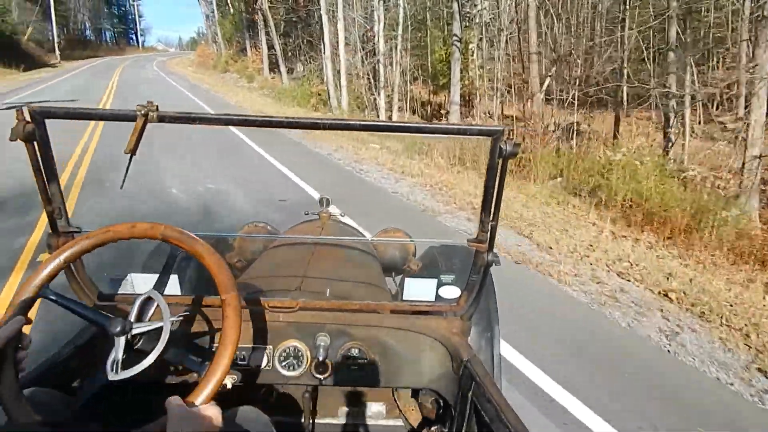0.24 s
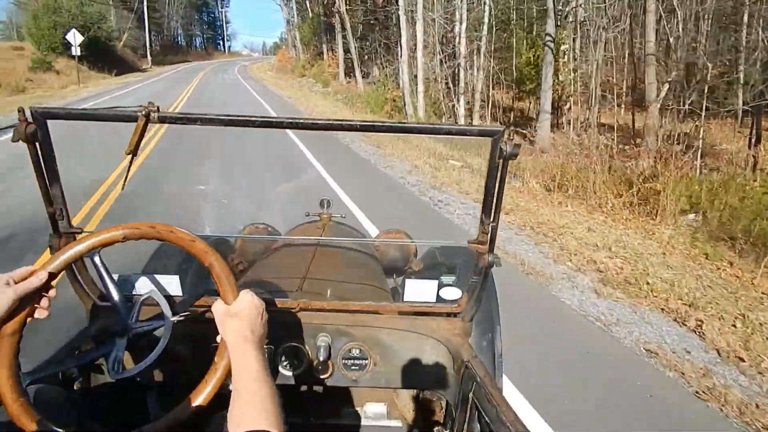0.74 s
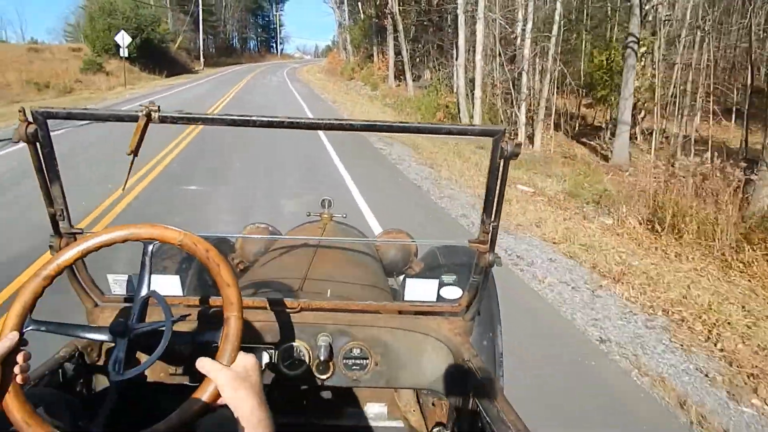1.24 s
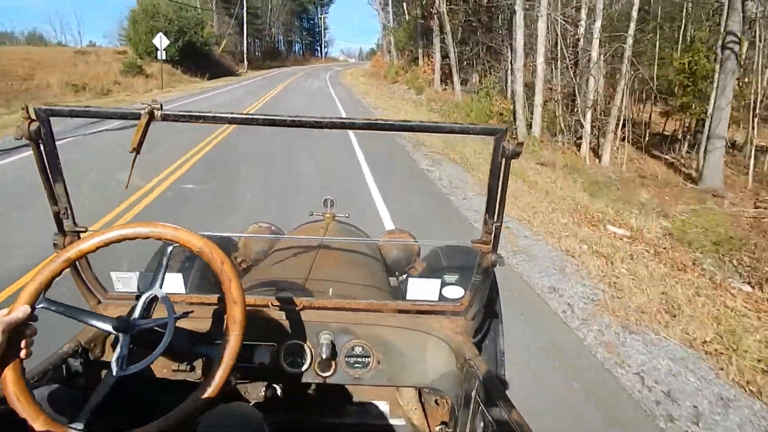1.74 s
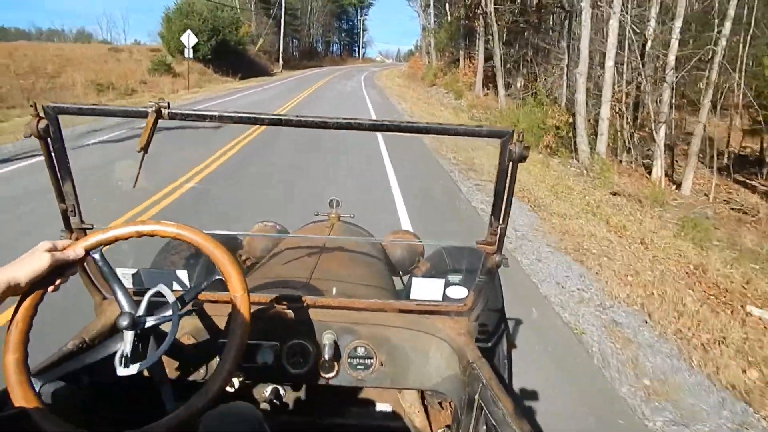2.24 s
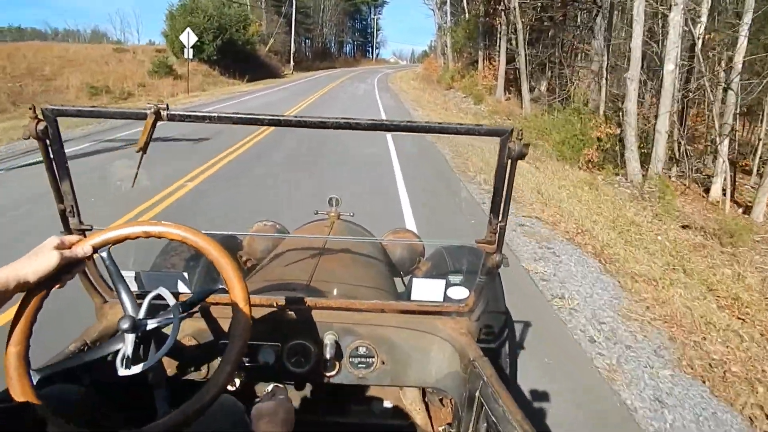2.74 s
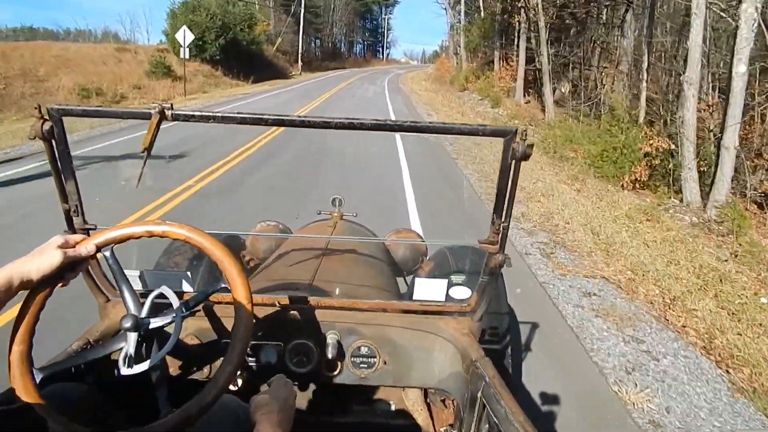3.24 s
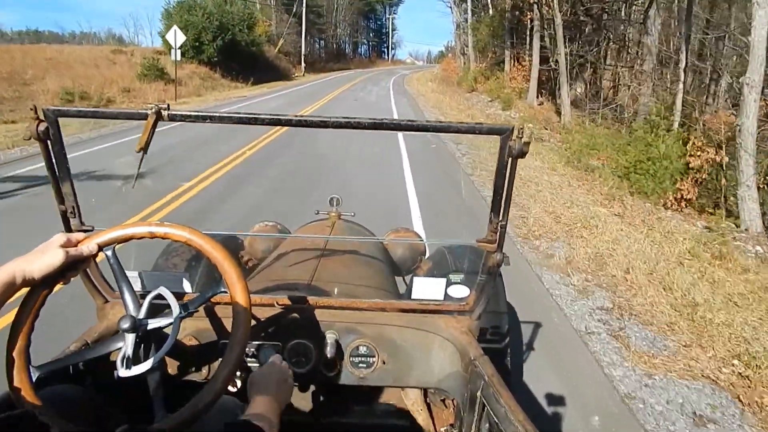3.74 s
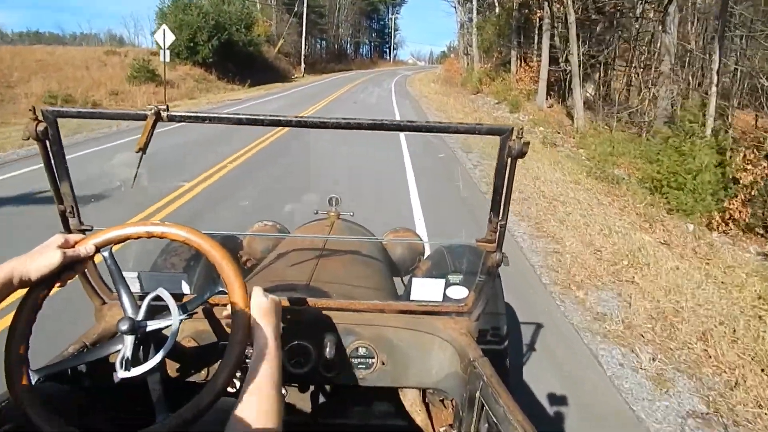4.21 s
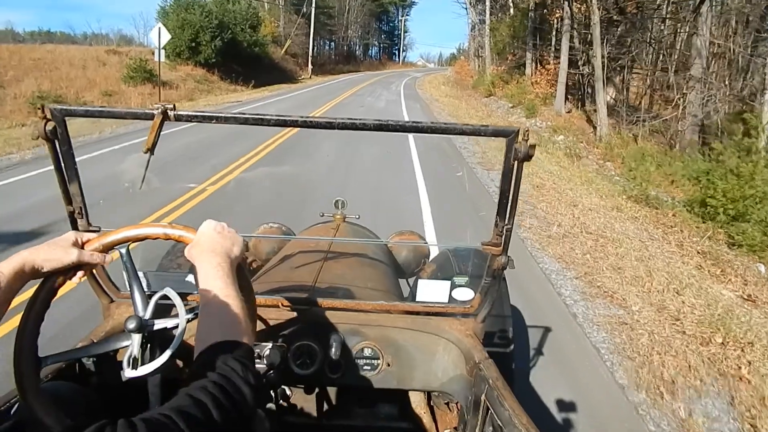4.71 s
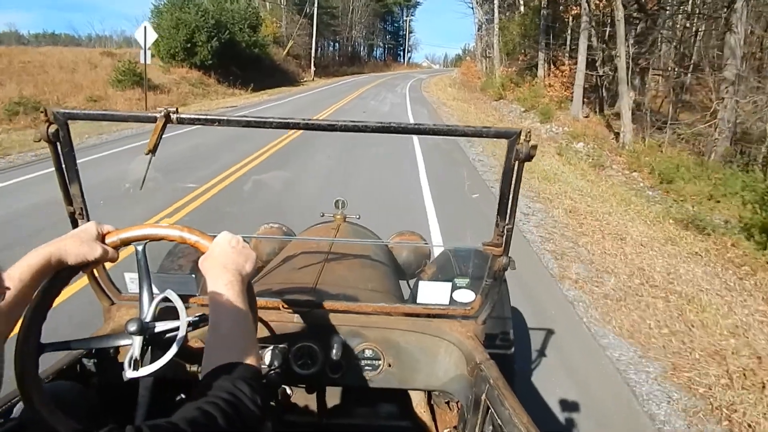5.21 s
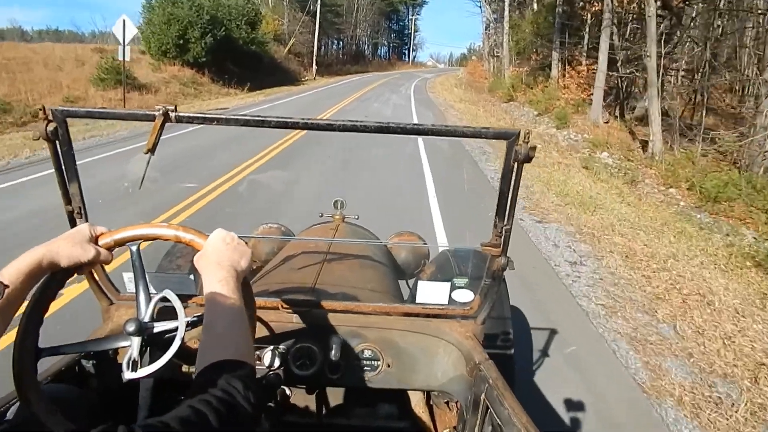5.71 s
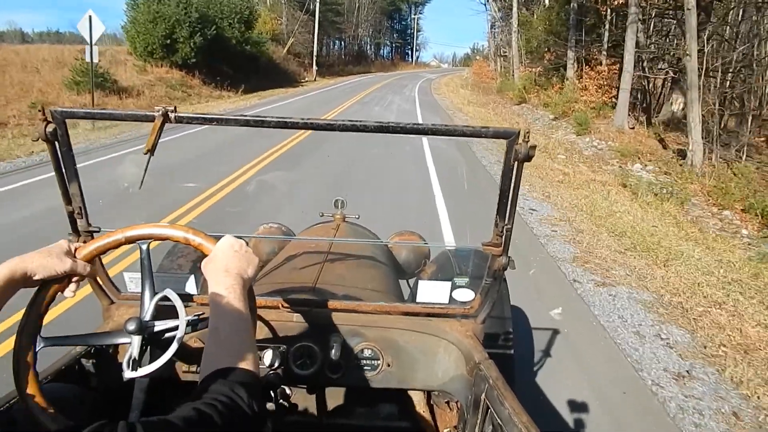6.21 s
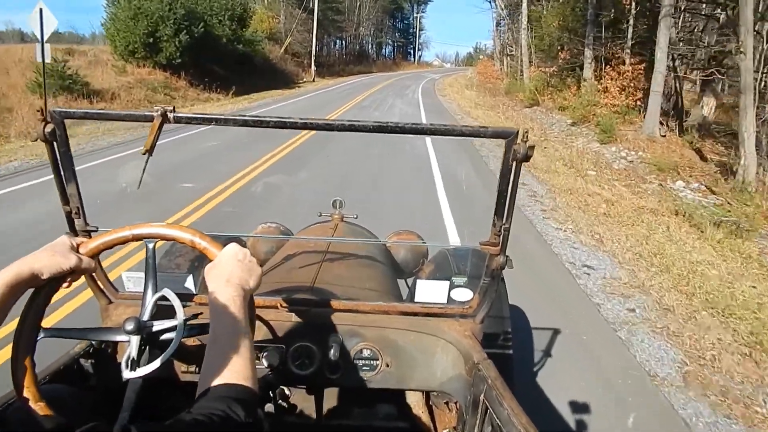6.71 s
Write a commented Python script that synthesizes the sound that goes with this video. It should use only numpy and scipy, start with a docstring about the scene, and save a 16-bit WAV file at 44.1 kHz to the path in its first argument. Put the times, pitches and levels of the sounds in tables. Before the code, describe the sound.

An old open car pulls away along a country road, heard from the driver's seat. The engine climbs with a throbbing roar, a rhythmic spitting hiss and a thin gear whine. The sound dips briefly, gear teeth grate, and the engine catches with uneven thumps. The revs then sag until it stumbles, while gusts of wind thud and flutter on the close microphone.

```python
"""A country road, heard from the driver's seat of an old six-cylinder open car as it pulls away.
The engine revs up, the sound drops out briefly, gear teeth grate, the revs sag and the engine stumbles.
Each firing sends a pulse down the tail pipe and shakes the body into a roar; one cylinder spits a hiss
once per engine cycle. The gearbox whines, and wind buffets two close microphone ports."""
import sys
import numpy as np
from scipy import signal
from scipy.fft import rfft, irfft
from scipy.io import wavfile

SR = 44100
rng = np.random.default_rng(int(sys.argv[2]) if len(sys.argv) > 2 else 0)


def put_to_file(sound):
    """Save the sound as 16-bit audio at rate SR, in the file named by the first command-line argument."""
    columns = np.atleast_2d(sound).T  # one column per channel
    safe = np.clip(columns, -1, 1)
    whole_steps = np.round(safe * 32767)
    wavfile.write(sys.argv[1], SR, whole_steps.astype(np.int16))


N = 306495
TIME = np.arange(N) / SR   # seconds


def from_db(db):
    """Turn decibels into a number to multiply by."""
    return 10 ** (np.asarray(db) / 20)


def rms_one(x):
    """Scale a signal to an average strength (rms) of 1."""
    return x / np.sqrt(np.mean(x ** 2) + 1e-20)


def in_time(rows):
    """Join a table's points with straight lines over time, one curve per value column."""
    times, *columns = np.transpose(rows)
    return [np.interp(TIME, times, column) for column in columns]


def at_hz(points, hz):
    """Look up a table's value at a pitch, with octaves evenly spaced."""
    pitches, values = np.transpose(points)
    return np.interp(np.log(hz), np.log(pitches), values)


def drift(rate):
    """A smooth random wobble of about size 1; a higher rate wobbles faster."""
    r = np.exp(-80 * np.pi * rate / SR)
    slow = signal.lfilter([1], [1, -2 * r, r * r], rng.standard_normal(N // 40 + 2002))[2000:]
    return np.interp(np.arange(N) / 40, np.arange(len(slow)), rms_one(slow))


def resonate(x, modes):
    """Let a signal ring at several pitches, added with alternating signs; narrow ones ring longer."""
    out = 0
    for k, (hz, width_hz, level_db) in enumerate(modes):
        r = np.exp(-np.pi * width_hz / SR)
        b = (1 - r * r) / 2 * np.array([1, 0, -1])
        a = [1, -2 * r * np.cos(2 * np.pi * hz / SR), r * r]
        out = out + (-1) ** k * from_db(level_db) * signal.lfilter(b, a, x + 1e-18)
    return out


def clicks(events):
    """One click for each (time, level) row."""
    out = np.zeros(N)
    for s, peak_db in events:
        out[round(s * SR)] = from_db(peak_db)
    return out


def bursts(events, rise_s, fall_s, tail_s, tail):
    """A loudness curve that jumps at each event, falls fast and leaves a slower tail."""
    t = np.arange(round(.15 * SR)) / SR
    shape = (1 - np.exp(-t / rise_s)) * (np.exp(-t / fall_s) + tail * np.exp(-t / tail_s))
    return signal.fftconvolve(clicks(events), shape / shape.max())[:N]


def held(rows, rise_s, fall_s):
    """A loudness curve that fades in, holds from each row's start to its end, and fades out."""
    return sum(from_db(db) * np.interp(TIME, [start - rise_s, start, end, end + fall_s], [0, 1, 1, 0]) ** 2
               for start, end, db in rows)


# how alike left and right are: (pitch [Hz], likeness [1 = the same])
STEREO_LIKENESS = [(60, 1), (700, 1), (1100, 0.81), (2400, 0.41), (6000, 0.093), (15000, -0.15)]

def stereo_noise(spectrum):
    """Noise with a given tone colour, the same on both sides in the bass and wide in the treble."""
    hz = np.maximum(np.fft.rfftfreq(N, 1 / SR), 1)
    alike = np.clip(at_hz(STEREO_LIKENESS, hz), -1, 1)
    mid, side = rfft(rng.standard_normal((2, N)))
    both = np.sqrt(1 + alike) * mid + np.sqrt(1 - alike) * side * [[1], [-1]]
    return rms_one(irfft(both * from_db(at_hz(spectrum, hz)), N))


# exhaust pulse of each of the six cylinders: (strength [dB])
CYLINDER_STRENGTHS = [-1.5, -1.5, -1, -2.5, 0, -6]

def firing_pulses(firings, uneven_db):
    """The cylinders fire in turn, one click each, never quite alike."""
    at = np.flatnonzero(np.diff(np.floor(firings)))
    pulses = np.zeros(N)
    pulses[at] = from_db(np.resize(CYLINDER_STRENGTHS, len(at)) + uneven_db * rng.standard_normal(len(at)))
    return pulses


# spells of deep wind: (start [s], end [s], level [dB])
BUFFET_SPELLS = [(-.1, 2.6, -54), (1.9, 2.4, -47), (4.0, 4.5, -47), (5.5, 6.95, -39)]

def wind_buffet():
    """Wind beats on the microphone ports with a deep, lumpy rumble."""
    rumble = stereo_noise([(12, -15), (22, -23), (40, 14), (60, 11), (120, -34), (300, -90)])
    lumps = from_db(2.5 * drift(5.0))
    return held(BUFFET_SPELLS, rise_s=0.32, fall_s=0.25) * lumps * rumble


# wind between gusts: (time [s], thud level [dB], flutter level [dB])
BREEZE_LEVELS = [(0, -37, -42), (2.1, -36.5, -46), (2.9, -40, -38), (3.75, -42.5, -36), (4.8, -27, -40.5),
                 (6.3, -23, -31.5), (6.45, -81, -65), (6.95, -70, -75)]
# single gusts: (time [s], thud level [dB], flutter level [dB])
GUST_PEAKS = [(.7, -23, -39), (.85, -23, -39), (2.27, -26, -30), (2.52, -19, -33), (2.7, -36, -28),
              (2.78, -36, -28), (2.89, -27, -26), (3.36, -33, -40), (3.87, -25, -51), (3.97, -18.5, -32),
              (4.1, -20, -38), (4.33, -18, -27), (4.65, -29, -32), (5.05, -24, -36), (5.28, -24, -39),
              (5.62, -12.5, -31.5), (5.9, -29, -28), (6.23, -35, -26.5), (6.339, -51, -26),
              (6.42, -58, -29.5)]
# how the ports ring, one list for the thud and one for the flutter: (pitch [Hz], width [Hz], level [dB])
PORT_RINGS = [
    [(108, 125, -3.5), (62, 37, -3)],
    [(382, 146, 4), (690, 340, -3.5)],
]

def wind_gusts():
    """Gusts ring each port on its own, making a low thud and a higher flutter."""
    out = 0
    times, *peaks_db = np.transpose(GUST_PEAKS)
    for modes, breeze_db, peak_db in zip(PORT_RINGS, in_time(BREEZE_LEVELS), peaks_db):
        gain = from_db(breeze_db) + held(zip(times, times, peak_db), rise_s=0.085, fall_s=0.095)
        lumps = from_db(4.5 * np.array([drift(13.3), drift(27.0)]))
        ringing = resonate(resonate(rng.standard_normal((2, N)), modes), modes)
        out = out + np.sqrt(2) * gain * rms_one(lumps * ringing)
    return out


# loudness of the car body and the air: (time [s], roar level [dB], hiss level [dB])
ROAR_AND_HISS_LEVELS = [(0, -25, -40), (1.15, -26, -40.5), (1.8, -24, -38), (2.6, -27.5, -40.5),
                        (2.9, -23.5, -38), (3.8, -25.5, -36.5), (3.98, -20, -34), (4.22, -26.5, -39.5),
                        (5.5, -26, -41.5), (5.9, -25.5, -40.5), (6.4, -27.5, -41.5), (6.78, -31.5, -43.5),
                        (6.95, -28.5, -37)]
# tone colour of the air: (pitch [Hz], relative level [dB])
AIR_COLOUR = [(880, 2), (1500, -7), (1880, -5.5), (2530, -6.5), (3330, -6), (7380, -11), (8990, -9),
              (11800, -8), (14500, -14.5), (15700, -43)]

def air_hiss(dip_db):
    """The air hisses, flickering slightly."""
    _, hiss_db = in_time(ROAR_AND_HISS_LEVELS)
    return from_db(hiss_db + dip_db + 1.36 * drift(26.0)) * stereo_noise(AIR_COLOUR)


# tone colour of the roar: (pitch [Hz], relative level [dB])
ROAR_COLOUR = [(110, -60), (190, -7.5), (282, -12), (355, 0), (403, 0), (435, -5), (476, -3.5), (697, -9),
               (772, -10.5), (959, -17.5), (1930, -26.5), (2530, -31), (4000, -37.5), (5200, -65),
               (8800, -120)]
# how the body panels ring: (pitch [Hz], width [Hz], level [dB])
PANEL_RINGS = [(370.8, 58, 1.5), (562.8, 24, 3.5), (469, 59, -7), (657, 45, -7)]

def body_roar(firings, firing_hz, dip_db):
    """The body roars, throbbing with each firing and brighter at high revs; its shaken panels ring."""
    roar_db, _ = in_time(ROAR_AND_HISS_LEVELS)
    noise = stereo_noise(ROAR_COLOUR)
    treble = signal.sosfilt(signal.butter(2, 600, "high", fs=SR, output="sos"), noise)
    noise = noise + (from_db(0.18 * (firing_hz - 66.5)) - 1) * treble
    shaking = rms_one(firing_pulses(firings, uneven_db=3.0)) + 0.74 * rng.standard_normal(N)
    panels = from_db(-9.0) * rms_one(resonate(resonate(shaking, PANEL_RINGS), PANEL_RINGS))
    throb = 1 + .3 * np.cos(2 * np.pi * (firings - .25))
    return from_db(roar_db + dip_db + 1.14 * drift(13.5)) * (throb * noise + panels)


# first gear's whine, louder at some pitches: (pitch [Hz], level [dB])
FIRST_GEAR_LEVELS = [(350, -48), (371, -32), (392, -38), (408, -26.5), (420, -26), (432, -40), (448, -35),
                     (510, -38.5)]
# swells of the later whine that rises with road speed: (start [s], end [s], level [dB])
ROAD_WHINE_SWELLS = [(6.1, 6.62, -39), (6.22, 6.4, -36), (6.68, 6.9, -42.5)]

def gearbox_whine(firings, firing_hz):
    """Two thin gear tones: one follows the engine and sits to the right, a later one climbs slowly."""
    first_gear = tone(6 * firings, at_hz(FIRST_GEAR_LEVELS, 6 * firing_hz), waver_db=3.0)
    first_gear *= held([(0, 2.55, 0)], rise_s=.1, fall_s=.1)
    road_hz = (454 + 65 * (TIME - 5.95)) * (1 + 0.007 * drift(17.0))
    road = tone(np.cumsum(road_hz) / SR, level_db=0, waver_db=5.0)
    road *= held(ROAD_WHINE_SWELLS, rise_s=.12, fall_s=.15)
    return first_gear * from_db([[-2.5], [2.5]]) + road


def tone(turns, level_db, waver_db):
    """A pure tone, one wave per turn, whose loudness wavers."""
    return np.sqrt(2) * from_db(level_db + waver_db * drift(9.0)) * np.sin(2 * np.pi * turns)


# longer scrapes of the gear teeth: (start [s], end [s], dull level [dB], bright level [dB])
TOOTH_SCRAPES = [(3.309, 3.332, -28.5, -38), (3.374, 3.418, -23, -63), (3.493, 3.555, -18.5, -27.5),
                 (3.61, 3.698, -23, -35)]
# single bites of the teeth: (time [s], relative bright level [dB], relative dull level [dB])
TOOTH_BITES = [(3.3218, -23, -40), (3.351, -37, -34), (3.388, -49, -25), (3.471, -48, -15),
               (3.5104, -25, -25), (3.549, -29, -23), (3.5755, -47, -11), (3.609, -35, -13.5),
               (3.6594, -20, -36), (3.6874, -32, -27), (3.7144, -30, -24), (3.7505, -19.5, -19)]
# how the gearbox casing rings, the four dull rings first: (pitch [Hz], width [Hz], level [dB])
CASING_RINGS = [(372, 32, 3), (502, 32, -4), (555, 21, 0.5), (1248, 93, -17.5), (1680, 600, -23),
                (2920, 300, -21), (3370, 750, -29), (3890, 120, -20.5), (4570, 4100, -33.5),
                (5680, 130, -26.5), (7750, 130, -25), (9750, 1300, -29.5), (10500, 790, -27.5),
                (12500, 2700, -35.5)]

def gear_grate():
    """Gear teeth skip over each other, and their dense, uneven clicks ring the casing."""
    scrapes, bites = np.array(TOOTH_SCRAPES), np.array(TOOTH_BITES)
    dull_bites = bursts(bites[:, [0, 2]], rise_s=0.002, fall_s=0.009, tail_s=0.026, tail=.2)
    bright_bites = bursts(bites[:, :2], rise_s=0.0017, fall_s=0.0047, tail_s=0.043, tail=0.37)
    fades = dict(rise_s=0.07, fall_s=0.077)
    dull_gain = held(scrapes[:, :3], **fades) + from_db(-4.0) * dull_bites
    bright_gain = held(scrapes[:, [0, 1, 3]], **fades) + from_db(-11.5) * bright_bites
    clicks_per_s = np.array([[800], [5000], [5000]])   # dull, bright left, bright right
    sizes = from_db(2.4 * np.minimum(rng.exponential(1, (3, N)), 5)) * rng.choice([-1, 1], (3, N))
    teeth = sizes * (rng.random((3, N)) < clicks_per_s / SR)
    dull = rms_one(resonate(teeth[0], CASING_RINGS[:4]))
    bright = rms_one(resonate(teeth[1:], CASING_RINGS[4:]))
    return dull_gain * dull + bright_gain * bright


# spells of spitting: (start [s], end [s], relative start level [dB], relative end level [dB])
SPIT_SPELLS = [(0.0407, 2.5, -29.5, -31), (4.2003, 4.8, -33.5, -24), (4.83, 5.55, -29.5, -23.5),
               (5.575, 6.95, -27.5, -26.5)]
# tone colour of a spit: (pitch [Hz], relative level [dB])
SPIT_HISS_COLOUR = [(700, -19), (1500, -4), (3000, -1), (6000, -6), (7400, -6.5), (10500, -0.5),
                    (12500, -3), (14500, -5.5), (15800, -10)]

def cylinder_spit(firing_hz):
    """One cylinder spits a short, ragged hiss once per engine cycle, which is every six firings."""
    cycles = np.cumsum(firing_hz) / SR / 6
    spits = []
    for start_s, end_s, start_db, end_db in SPIT_SPELLS:
        first_cycle, last_cycle = np.interp([start_s, end_s], TIME, cycles)
        times = np.interp(np.arange(first_cycle, last_cycle), cycles, TIME)
        scatter_db = 1.8 * drift(24.0)[(times * SR).astype(int)]
        levels_db = np.interp(times, [start_s, end_s], [start_db, end_db]) + scatter_db
        spits += zip(times - .001, levels_db)
    ragged = from_db(1.2 * drift(60.0))
    puffs = bursts(spits, rise_s=0.01, fall_s=0.006, tail_s=0.048, tail=0.16)
    return from_db(-8.5) * puffs * ragged * stereo_noise(SPIT_HISS_COLOUR)


# when the exhaust tones sound, with the engine pulling or revving freely:
# (start [s], end [s], firing tone level [dB], other tones' level [dB])
DRONE_SPELLS = [(-.1, 2.57, -1.5, -0.5), (2.61, 2.68, -20, 2), (3.33, 3.65, -33, -5),
                (3.68, 4.2, -18, -1.5), (4.1, 5.57, -1.5, -1.5), (5.62, 5.9, -5, -7), (6.63, 6.95, 4, -19)]
# tones that add up to a pressure peak and a steep fall: (pitch [times the firing rate], phase [turns])
ENGINE_TONES = [(1, 0), (1.5, 0), (2, .62), (3, 0), (.5, 0), (2.5, .3)]
# each of those tones in the same order: (relative level [dB])
TONE_STRENGTHS = [0.3, -10.5, -0.95, -6.5, -5.5, -13.5]
# how a tone's loudness depends on its pitch: (pitch [Hz], relative level [dB])
LEVEL_BY_PITCH = [(28, -27), (33, -34), (38, -49.5), (50, -20.5), (60, -15), (70, -13), (83, -12),
                  (98, -29), (113, -12.5), (124, -13.5), (145, -16), (168, -22.5), (215, -28.5), (255, -51)]

def exhaust_drone(firings, firing_hz):
    """The regular part of the exhaust pulses makes clean tones that follow the revs."""
    firing_tone, *others = (
        tone(multiple * firings + phase, own_db + at_hz(LEVEL_BY_PITCH, multiple * firing_hz), waver_db=1.3)
        for (multiple, phase), own_db in zip(ENGINE_TONES, TONE_STRENGTHS))
    spells = np.array(DRONE_SPELLS)
    fades = dict(rise_s=0.042, fall_s=0.055)
    drone = held(spells[:, :3], **fades) * firing_tone + held(spells[:, [0, 1, 3]], **fades) * sum(others)
    return drone * from_db(0.85 * drift(11.0))   # the load surges on all tones together


# how the tail pipe rings: (pitch [Hz], width [Hz], level [dB])
PIPE_RINGS = [(110.4, 35, -0.5), (155.5, 37, -3.5), (74.6, 23, -18.5), (230, 70, -18)]
# loudness of the uneven exhaust beat: (time [s], level [dB])
BEAT_LEVELS = [(0, -20), (.9, -25.5), (2.55, -21), (2.66, -15.5), (2.71, -34), (2.78, -33), (2.82, -17),
               (2.9, -30), (3.3, -23), (3.4, -27), (3.9, -23), (3.98, -19), (4.2, -25.5), (5.6, -22.5),
               (5.9, -18), (6.3, -28.5), (6.95, -22.5)]
# lone firings as the drive takes up and as the engine stumbles: (time [s], level [dB])
LONE_FIRINGS = [(2.652, -9), (2.814, -17), (2.83, -10.5), (2.868, -12), (3.261, -21.5), (3.347, -21),
                (3.372, -12.5), (3.697, -6.5), (3.733, -18), (3.773, -12), (3.807, -11), (3.849, -14),
                (3.881, -18), (3.934, -15), (3.96, -3.5), (4.008, -10), (4.063, -7), (5.991, -19),
                (6.052, -16), (6.134, -11), (6.226, -9.5), (6.616, -15), (6.639, -12.5), (6.674, -13.5),
                (6.72, -13), (6.753, -8.5), (6.786, -10), (6.809, -15), (6.863, -13.5), (6.888, -14),
                (6.915, -13), (6.933, -10)]

def exhaust_beat(firings, dip_db):
    """The uneven part of the pulses rings the tail pipe, and lone firings thump in it."""
    pulses = firing_pulses(firings, uneven_db=2.0)
    uneven = pulses - (pulses > 0) * pulses[pulses > 0].mean()
    beat = from_db(in_time(BEAT_LEVELS)[0] + dip_db) * rms_one(resonate(uneven, PIPE_RINGS))
    thumps = resonate(clicks(LONE_FIRINGS), PIPE_RINGS)
    loudest_db = max(db for _, db in LONE_FIRINGS)
    return beat + from_db(loudest_db) * thumps / np.abs(thumps).max()


# brief dips in loudness: (start [s], hold [s], recovery [s], change in the roar [dB])
LEVEL_DIPS = [(2.296, 0.028, 0.12, -2.5), (2.911, 0.35, 0.12, -13.5), (5.607, .1, 0.21, -4),
              (5.921, .02, 0.45, -8), (6.462, 0.15, 0.09, -5.5)]

def level_dips_db(fall_s=0.0083):
    """The level drops at once, stays low for a moment, then comes back."""
    return sum(db * np.interp(TIME, np.cumsum([start_s, fall_s, hold_s, back_s]), [0, 1, 1, 0])
               for start_s, hold_s, back_s, db in LEVEL_DIPS)


# engine speed: (time [s], firing rate [Hz])
ENGINE_SPEED = [(0, 58.21), (.5, 63.11), (1, 70.23), (1.6, 75.37), (2.6, 84.78), (3.3, 80), (3.8, 77),
                (4.1, 77.61), (4.4, 79.03), (4.76, 72.58), (5.4, 60.64), (6, 48.6), (6.42, 40.13),
                (6.95, 41.41)]
# the car sits slightly to the right: (time [s], left minus right [dB])
BALANCE = [(0, -0.4), (3.4, -1.5), (5.2, -0.8), (6.35, -0.5), (6.95, -0.5)]

def scene():
    """Mix the car and the wind; one engine speed keeps exhaust, roar, spit and first gear in step."""
    firing_hz, = in_time(ENGINE_SPEED)
    firings = np.cumsum(firing_hz * (1 + 0.0033 * drift(8.8))) / SR   # running count of firings
    dip_db = level_dips_db()
    bass_dip_db = 1.55 * dip_db   # the beat and the wind dip deepest
    car = air_hiss(0.7 * dip_db)
    car += exhaust_drone(firings, firing_hz) + exhaust_beat(firings, bass_dip_db)
    car += gearbox_whine(firings, firing_hz)
    car += body_roar(firings, firing_hz, dip_db)
    car += from_db(0.81 * dip_db) * cylinder_spit(firing_hz)
    car += gear_grate()
    sides = from_db(in_time(BALANCE)[0] / 2 * [[1], [-1]])
    wind = wind_buffet() + wind_gusts()
    return sides * car + from_db(bass_dip_db) * wind


# narrow gaps in the treble: (pitch [Hz], width [Hz])
TREBLE_GAPS = [(2490, 114), (7480, 170)]

def record(dry, cutoff_hz=15870):
    """Cut two narrow gaps in the treble, round off loud peaks and remove the very highest sounds."""
    for hz, width_hz in TREBLE_GAPS:
        dry = signal.lfilter(*signal.iirnotch(hz, hz / width_hz, SR), dry)
    rounded = 1.2 * np.tanh(dry / 1.2)
    return signal.sosfilt(signal.ellip(12, .5, 75, cutoff_hz, fs=SR, output="sos"), rounded)


dry = scene()
out = record(dry)
put_to_file(out)
```